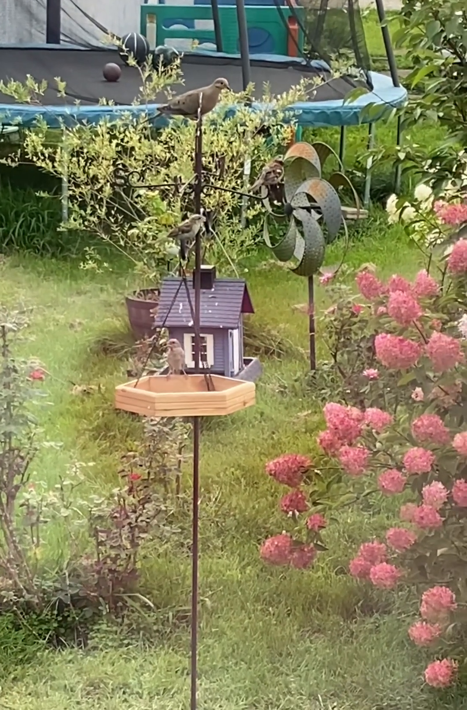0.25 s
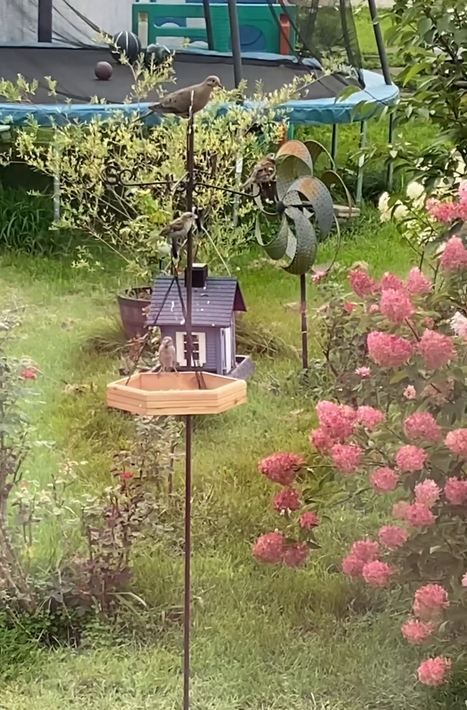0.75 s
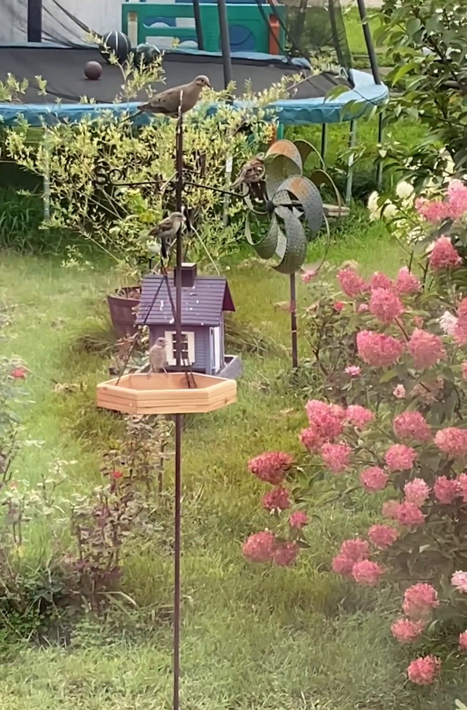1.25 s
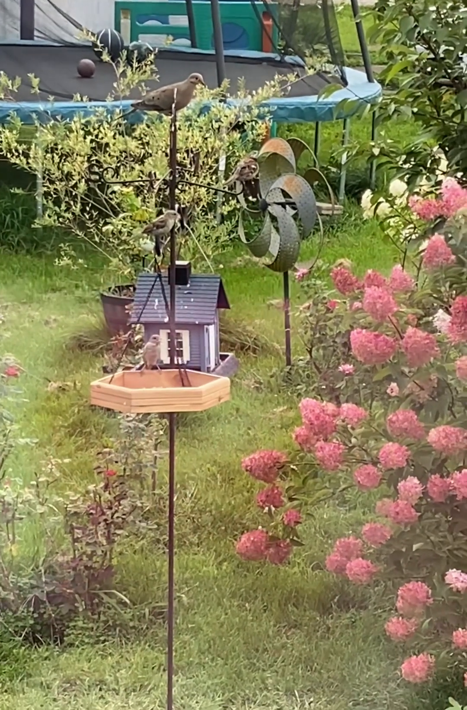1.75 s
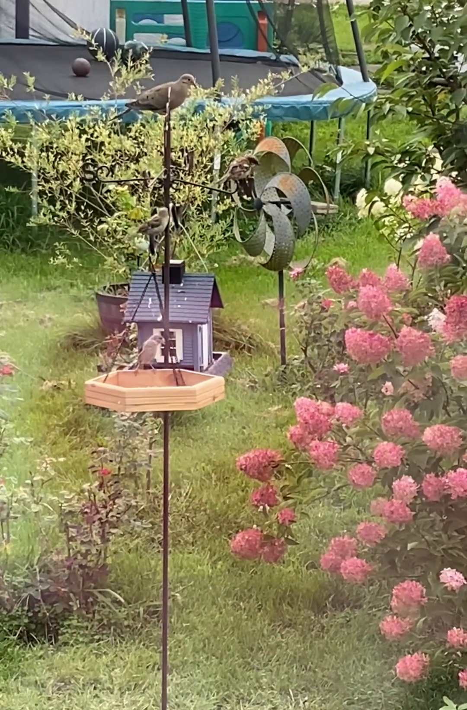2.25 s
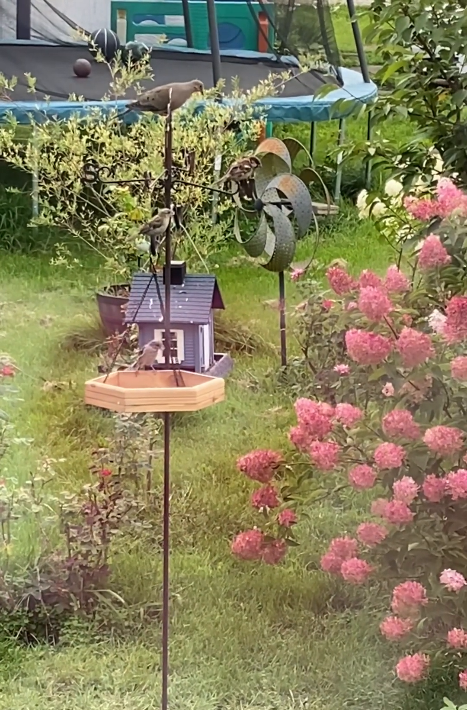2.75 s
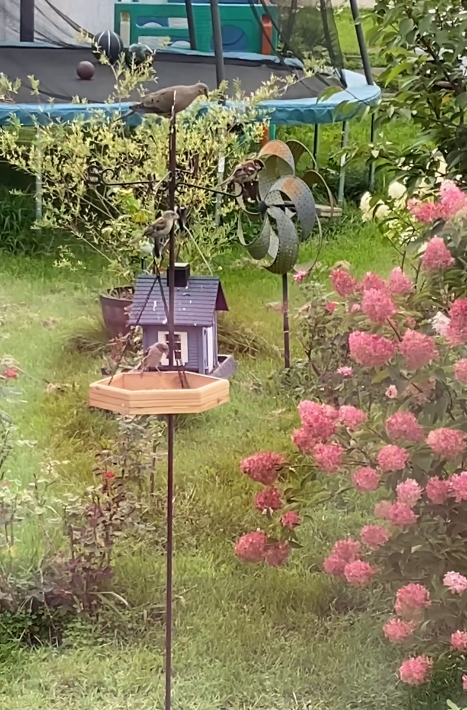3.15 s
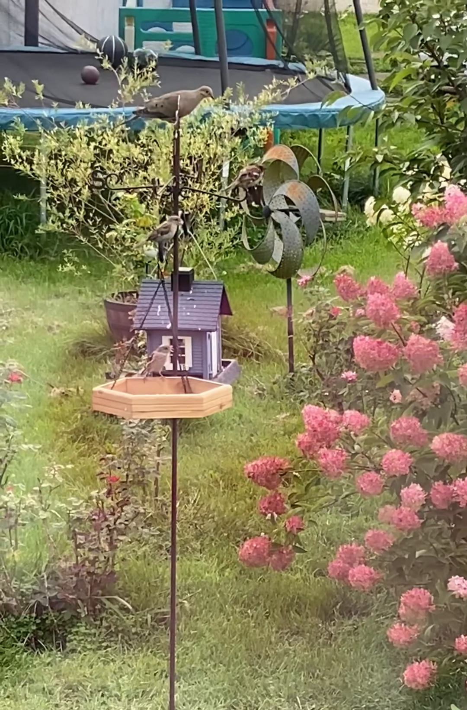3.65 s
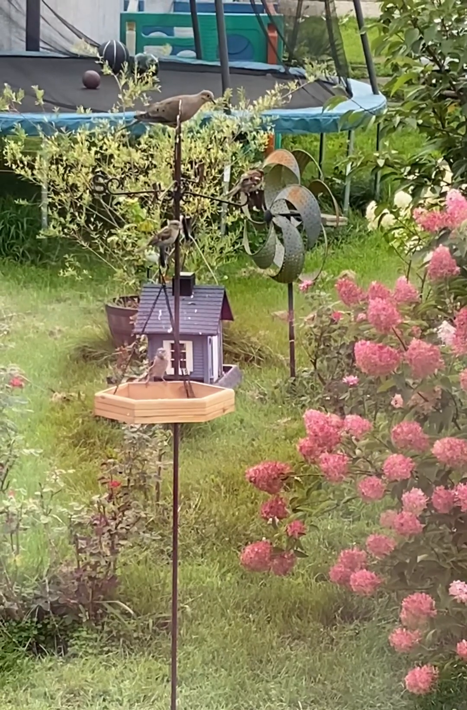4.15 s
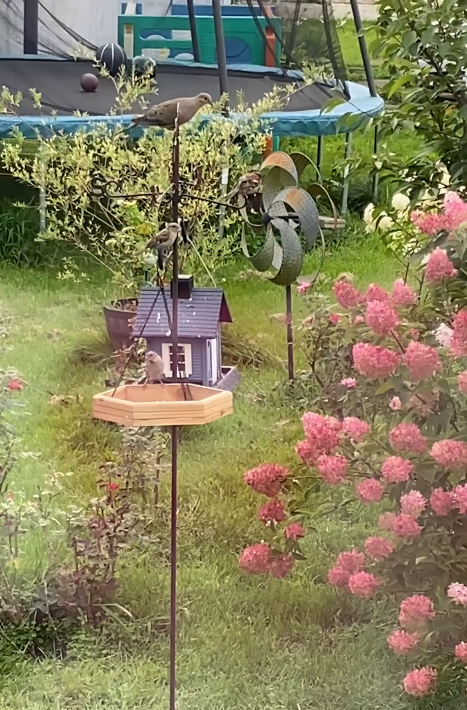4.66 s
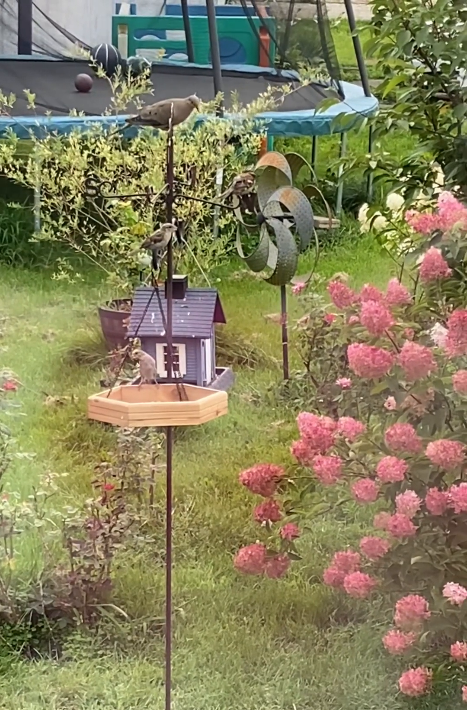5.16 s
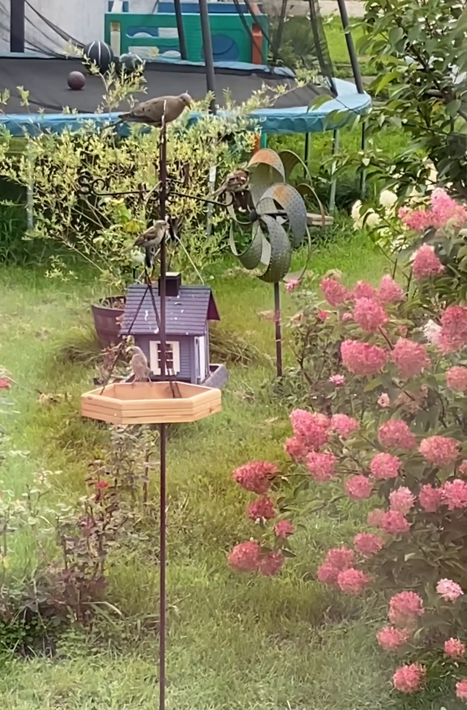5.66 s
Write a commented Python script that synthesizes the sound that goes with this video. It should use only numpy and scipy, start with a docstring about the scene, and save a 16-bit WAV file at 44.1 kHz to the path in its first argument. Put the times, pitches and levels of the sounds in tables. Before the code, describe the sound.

Quiet backyard ambience: low, wavering motor drone and far traffic rumble under continuous thin cricket trilling. One closer cricket chirps in bright quick triplets while several fainter ones overlap at different pitches. Soft brushing hisses fall in a regular two-beat pattern. A short scuff and snap occurs before one second, two faint distant hoots are nearly buried, and a low knock comes at about 5.4 seconds. Small stereo microphone, dry close details.

```python
"""A low engine drone, a machine hum and the rumble of a town are there at once, under thin high cricket trills.
Faint crickets answer one another, and a nearer one chirps in threes; each wing stroke is a short sagging tone.
Gritty noise makes the close rustles, early on and once near the end, and soft swishes in a two-beat rhythm.
Engine, hum and two faint hoots are wavering sine tones; the town is stereo noise shaped by frequency."""
import sys
import numpy as np
from scipy import signal
from scipy.fft import rfft, irfft, next_fast_len
from scipy.io import wavfile
from scipy.ndimage import uniform_filter1d, map_coordinates

SR = 44100
rng = np.random.default_rng(int(sys.argv[2]) if len(sys.argv) > 2 else 0)


def master_out(mix):
    """Clip the mix to full scale and print it as 16-bit PCM to the path in sys.argv[1]."""
    frames = np.transpose(np.atleast_2d(mix))
    ceiling = np.clip(frames, -1, 1)
    pcm = np.round(ceiling * 32767).astype(np.int16)
    wavfile.write(sys.argv[1], SR, pcm)


N = 259749
TIME = np.arange(N) / SR  # seconds


def amp(db):
    """Decibels to gain."""
    return 10 ** (np.asarray(db) / 20)


def unit(x):
    """Scale to rms 1."""
    return x / np.sqrt(np.mean(x ** 2) + 1e-20)


def along(points, hz):
    """Read a curve of (Hz, value) points on a log frequency axis."""
    f, v = np.transpose(points)
    return np.interp(np.log(hz + 1), np.log(f + 1), v)


def curves(rows):
    """Draw lines through timed rows: one value per sample for each column after the time."""
    s, *cols = np.transpose(rows)
    return [np.interp(TIME, s, c) for c in cols]


def wobble(rate):
    """A smooth random curve through `rate` random points a second."""
    points = rng.standard_normal(int(N * rate / SR) + 4)
    return map_coordinates(points, [TIME * rate])


def filtered(x, response):
    """Multiply the spectrum of x by a response that depends on frequency."""
    m = next_fast_len(N + SR // 2)
    hz = np.fft.rfftfreq(m, 1 / SR)
    return irfft(rfft(x, m) * response(hz), m)[..., :N]


def scatter(x, t60):
    """The wash of a sound among shrubs and walls, dying by 60 dB in t60 seconds."""
    t = TIME[:SR // 2]
    tail = rng.standard_normal(len(t)) * amp(-60 * t / t60)
    tail *= 1 - np.exp(-t / 0.0053)  # the wash builds up over some milliseconds
    return signal.fftconvolve(x, tail / np.linalg.norm(tail))[:N]


def swell(s, rise, t60):
    """An envelope that rises to 1 at time s and then dies by 60 dB in t60 seconds."""
    before = np.minimum(TIME - s, 0)
    after = np.maximum(TIME - s, 0)
    return np.exp(-(before / rise) ** 2) * amp(-60 * after / t60)


def grit(per_s, smooth):
    """Tiny snaps of random size at random times, over a share of smooth hiss; rms 1."""
    snaps = (rng.random(N) < per_s / SR) * rng.standard_normal(N)
    return unit(unit(snaps) + smooth * rng.standard_normal(N))


def add_stroke(out, s, db, hz, width, fall, brake=.3):
    """One wing closure: a tone that swells and sags by the share fall per width, faster as the scraper brakes."""
    i = np.arange(*np.searchsorted(TIME, [s - 3 * width, s + 3 * width]))
    u = (TIME[i] - s) / width
    pitch = hz * (1 - fall * (u + brake * u ** 2))
    phase = 2 * np.pi * (np.cumsum(pitch) / SR + rng.random())
    out[i] += amp(db) * np.exp(-u ** 2) * np.sin(phase)


# How alike left and right are in the background.
# Each row: frequency in Hz, likeness (1 = identical).
ALIKENESS = [(100, 1), (200, .99), (350, 0.85), (650, 0.51), (1300, 0.41), (2500, 1), (3500, 1), (6000, 1),
             (13000, 1)]
# How far the background leans to the left.
# Each row: frequency in Hz, left level over right level in dB.
LEFT_LEAN = [(120, -0.5), (370, 2.5), (680, 5), (1240, 1.5), (3000, 0)]


def diffuse(spectrum):
    """Stereo noise of rms 1 from all round: a shared part and an opposed part set how alike the sides are."""
    def mid_side(hz):
        turn = np.arccos(np.clip(along(ALIKENESS, hz), -1, 1)) / 2
        return amp(along(spectrum, hz)) * [np.cos(turn), np.sin(turn)]

    mid, side = filtered(rng.standard_normal((2, N)), mid_side)
    pair = np.array([mid + side, mid - side])
    return unit(filtered(pair, lambda hz: amp(np.outer([.5, -.5], along(LEFT_LEAN, hz)))))


# The colour of the low rumble; only the shape counts.
# Each row: frequency in Hz, relative level in dB per Hz.
RUMBLE_COLOUR = [(20, -27), (30, -15), (42, -3.5), (60, 2), (120, -0.5), (180, -.5), (230, -9), (310, -9.3),
                 (420, -23), (800, -67)]
# The colour of the softer rush above it; only the shape counts.
# Each row: frequency in Hz, relative level in dB per Hz.
AIR_COLOUR = [(150, -8), (300, 1), (420, -1), (520, -1.5), (700, -1), (1000, -10), (1500, -18.5),
              (2000, -28), (3300, -33), (4600, -30), (6300, -39.5), (10500, -39.5), (12300, -42),
              (14000, -56)]


def town(rumble_db=-49.0, air_db=-62.3, sway_db=1.04, patchy_db=1):
    """Low rumble of far traffic, and the softer, slightly restless rush above it, both as shaped noise."""
    z = signal.stft(diffuse(AIR_COLOUR), nperseg=1024)[2]
    # small patches of time and pitch get a little louder or softer
    patches = uniform_filter1d(rng.standard_normal(z.shape[1:]), size=4, axis=0)
    patches = uniform_filter1d(patches, size=10, axis=1)
    air = signal.istft(z * amp(patchy_db * unit(patches)), nperseg=1024)[1][:, :N]
    rumble = amp(rumble_db + sway_db * wobble(3)) * diffuse(RUMBLE_COLOUR)
    return rumble + amp(air_db) * air


# The steady machine tones.
# Each row: pitch in Hz, level in dB halfway through, change of level in dB per second.
HUM_TONES = [(58.5, -54.5, -1), (135.9, -50, -0.2), (513, -81, 0), (604, -76, 0), (711, -77, .5)]
# One more machine tone, which comes and goes.
# Each row: time in seconds, level in dB.
WHINE_LEVEL = [(0, -61.5), (1.3, -63), (1.7, -57), (2.2, -65), (2.4, -58.5), (2.75, -67), (3.3, -61),
               (3.9, -64), (4.35, -56.5), (4.8, -62), (5.3, -55.5), (5.89, -58)]
WHINE_HZ = 272


def hum(waver_db=1.8, drift_per_hz=.003):
    """Machine tones that waver on their way through the air; the higher the tone, the more its phase drifts."""
    tones = [(hz, db + trend * (TIME - TIME.mean())) for hz, db, trend in HUM_TONES]
    tones += [(WHINE_HZ, curves(WHINE_LEVEL)[0])]
    out = np.zeros(N)
    for hz, db in tones:
        level = np.sqrt(2) * amp(db + waver_db * wobble(8))  # root 2 turns rms into peak
        out += level * np.sin(2 * np.pi * hz * TIME + drift_per_hz * hz * wobble(10))
    return out


# How fast the engine turns. Each row: time in seconds, cycles per second.
CYCLE_RATE = [(0, 19.7), (.6, 19.9), (1.2, 20.15), (2.1, 20.86), (2.7, 20.6), (4.2, 20.21), (5.89, 20.1)]
# Its deepest tone, three times the cycle rate. Each row: time in seconds, level in dB.
THROB_LEVEL = [(0, -48), (.9, -56.5), (1.7, -51), (2.2, -43.5), (2.78, -42), (3.4, -52), (3.85, -45.5),
               (4.4, -44.5), (5.3, -57.5), (5.89, -47)]
# Its main drone, four times the cycle rate. Each row: time in seconds, level in dB.
DRONE_LEVEL = [(0, -51), (.22, -43.5), (.45, -52), (.62, -41), (1.2, -37), (1.38, -42.5), (1.6, -38.5),
               (2.02, -43.5), (2.2, -62), (2.45, -60), (2.62, -47), (3.1, -46.5), (4.2, -51), (4.85, -46),
               (5.6, -57), (5.89, -50)]
# Its upper tones, which grow while it pulls.
# Each row: multiple of the cycle rate, level in dB at zero effort, share of the effort added.
UPPER_ORDERS = [(5, -56, 1), (7, -55, .75)]
# How hard it works, heard in the upper tones. Each row: time in seconds, effort in dB.
EFFORT = [(0, 2.5), (.5, 2), (1.3, 6), (1.8, 10), (2.2, 6), (2.5, 0), (3.1, 2), (4.1, -3.5), (4.6, -1.5),
          (5.2, -2.5), (5.89, 4)]


def engine(flutter=0.25, waver_db=1.6):
    """Only the low orders of the exhaust carry this far; the upper ones grow with its effort."""
    rate, effort_db = curves(CYCLE_RATE)[0], curves(EFFORT)[0]
    cycle = 2 * np.pi * np.cumsum(rate) / SR
    orders = [(3, curves(THROB_LEVEL)[0]), (4, curves(DRONE_LEVEL)[0])]
    orders += [(round(k), db + share * effort_db) for k, db, share in UPPER_ORDERS]
    out = np.zeros(N)
    for k, db in orders:
        level = np.sqrt(2) * amp(db + waver_db * wobble(7))
        out += level * np.sin(k * cycle + 2 * np.pi * rng.random() + flutter * wobble(9))
    return out


# Faint distant hoots. Each row: time of the peak in seconds, pitch in Hz, level in dB.
HOOT_CALLS = [(.36, 604, -61.5), (1.695, 615, -57)]


def hoots(rise=0.03, t60=0.25):
    """Two soft, short tones from far away, slightly unsteady in phase."""
    out = np.zeros(N)
    for s, hz, db in HOOT_CALLS:
        out += amp(db) * swell(s, rise, t60) * np.sin(2 * np.pi * hz * TIME + .5 * wobble(40))
    return out


# The colour of the brushing noise; only the shape counts.
# Each row: frequency in Hz, relative level in dB.
SWISH_COLOUR = [(600, -5.5), (1500, -9.5), (2200, -10.5), (3050, -1), (3500, -8), (4300, 2), (4800, -1),
                (5700, -2), (6600, -9), (8500, -11), (10200, -17.5), (12000, -32.5)]
# Ringing tones inside the swish.
# Each row: pitch in Hz, width in Hz, relative level in dB before each beat's own change.
HOLLOW_RINGS = [(3040, 200, -4), (4340, 80, 4), (3900, 200, -7), (4900, 160, -8), (5650, 60, -8)]
# first beat, length of the whole cycle, delay of the second beat
SWISH_START_S, SWISH_CYCLE_S, SWISH_SECOND_S = .257, .8905, .521


def swishes(level_db=-68.6, second_db=0.4, grain_db=.7, catch_db=.9, wash_db=-10,
            first_ring_db=-3, second_ring_db=2, ring_scatter_db=2.5, detune=.004):
    """Short brushing hisses on something hollow, two in each even cycle; the second is set to ring more."""
    beats = [(s, level_db, first_ring_db) for s in np.arange(SWISH_START_S, N / SR, SWISH_CYCLE_S)]
    beats += [(s + SWISH_SECOND_S, db + second_db, second_ring_db) for s, db, _ in beats]
    hiss = np.zeros(N)
    for s, db, ring_db in beats:
        rings = [(hz * (1 + rng.normal(0, detune)), width, level + ring_db + rng.normal(0, ring_scatter_db))
                 for hz, width, level in HOLLOW_RINGS]

        def colour(f):
            ringing = sum(amp(level) / (1 + (2 * (f - hz) / width) ** 2) for hz, width, level in rings)
            return amp(along(SWISH_COLOUR, f)) + ringing

        stroke = swell(s, rise=0.019, t60=0.79)
        stroke /= 1 + np.exp(np.clip((TIME - s - .07) / 0.017, -50, 50))  # fades off around 70 ms
        hiss += amp(db) * stroke * unit(filtered(grit(per_s=3000, smooth=.8), colour))
    hiss *= amp(grain_db * wobble(300) + catch_db * wobble(70))  # the brushing catches and slips
    return hiss + amp(wash_db) * scatter(hiss, t60=0.48)


# Close rustles and taps; the rows at .785 and .795 s instead add to the second swish of the first cycle. Each
# row: time of the peak in seconds, level in dB before the envelope, rise in seconds, time to die by 60 dB in
# seconds, centre in Hz, width in octaves.
RUSTLE_EVENTS = [(.197, -75, 0.012, 0.16, 4500, 1.25), (.608, -60.5, 0.009, .14, 9000, 0.8),
                 (.608, -64, .003, .05, 5000, .6), (.616, -61.5, 0.003, 0.08, 3500, 1),
                 (.64, -69, 0.015, .6, 5500, 1.2), (.745, -77.5, 0.025, .45, 9800, 0.45),
                 (.795, -79, .025, .33, 9300, .4), (.785, -72, .016, .25, 3900, .5),
                 (.84, -72.5, 0.045, 0.28, 2170, 0.85), (.853, -74, .015, .3, 4850, .07),
                 (5.434, -58, .003, .13, 700, 0.85), (5.434, -78, .002, .07, 3600, .3)]


def rustles(grain_db=1.3, lump_db=.9, spread=0.25, top_hz=15000):
    """Brief scuffs and snaps close by: bands of gritty noise, slightly spread between left and right."""
    out = np.zeros((2, N))
    for s, db, rise, t60, centre, octaves in RUSTLE_EVENTS:
        def colour(hz):
            band = np.exp(-.5 * (np.log2((hz + 1) / centre) / octaves) ** 2)
            return band / (1 + (hz / top_hz) ** 10)

        middle, side = filtered(np.array([grit(per_s=2500, smooth=.7), rng.standard_normal(N)]), colour)
        pair = unit(np.array([middle + spread * side, middle - spread * side]))
        out += amp(db) * swell(s, rise, t60) * pair
    return out * amp(grain_db * wobble(400) + lump_db * wobble(60))


def far_trill(level_db=-87, range_db=3, centre_hz=7750, spread_hz=290, count=2600):
    """A crowd of more distant trillers, strokes at random times, fills the gaps of the nearer ones."""
    song = np.zeros(N)
    for (when, loud), pitch in zip(rng.random((count, 2)), rng.standard_normal(count)):
        hz = centre_hz + spread_hz * np.clip(pitch, -2.4, 1.6)
        add_stroke(song, when * N / SR, level_db + range_db * loud, hz, width=.005, fall=.01)
    return song


# Trills of small crickets; the first two rows are alternating strokes of one cricket.
# Each row: strokes per second, first stroke in seconds, pitch in Hz, level in dB before the swell,
# stroke width in seconds, share of the pitch lost per width.
TRILL_STROKES = [(16.4, .014, 7920, -71.3, .0055, .005), (16.4, .045, 7890, -74.5, .0055, .005),
                 (16.35, .02, 7400, -76, .011, .028)]
# How the whole trill swells and sinks. Each row: time in seconds, gain in dB.
TRILL_GAIN = [(0, -0.5), (1.3, -2.5), (2.1, -1), (2.6, 2.5), (3.4, 0.5), (3.65, -2.5), (4.65, -2),
              (5.25, 1.5), (5.6, -3), (5.89, 0)]


def trill(rasp=.5, rasp_width_hz=190, wash_db=-2.5, skirt_db=-26, jitter_s=.002, vary_db=1.5, detune=.005):
    """Small crickets stroke without a pause at nearly the same pace, one in two alternating strokes;
    another glides far down with every stroke."""
    song = np.zeros(N)
    for rate, first, hz, db, width, fall in TRILL_STROKES:
        for s in np.arange(first, N / SR, 1 / rate):
            when = s + rng.normal(0, jitter_s)
            level = db + rng.normal(0, vary_db)
            add_stroke(song, when, level, hz * (1 + rng.normal(0, detune)), width, fall, brake=.1)
    # uneven teeth spread the tone into a band with wide skirts
    song *= 1 + rasp * wobble(4 * rasp_width_hz) + amp(skirt_db) * wobble(3000)
    song += amp(wash_db) * scatter(song, t60=0.2)
    return song * amp(curves(TRILL_GAIN)[0])


def chorus(level_db=-92, range_db=6, centre_hz=4640, spread_hz=230, wash_db=-2, count=380):
    """Many more crickets, so far off that their strokes, at random times, blur together."""
    song = np.zeros(N)
    for (when, loud), pitch in zip(rng.random((count, 2)), rng.standard_normal(count)):
        hz = centre_hz + spread_hz * pitch
        add_stroke(song, when * N / SR, level_db + range_db * loud, hz, width=.0075, fall=.03)
    return song + amp(wash_db) * scatter(song, t60=.2)


# Chirps of four farther crickets.
# Each row: last stroke in seconds, its level in dB before the group gain, its pitch in Hz, number of strokes.
FAR_CHIRPS = [(.1, -74.5, 4840, 3), (.168, -76, 4080, 2), (.176, -71, 4560, 3), (.465, -73, 4640, 3),
              (.564, -76.5, 4060, 2), (1.066, -73, 4580, 2), (1.232, -70, 4930, 3), (1.245, -77, 4060, 2),
              (1.377, -73, 4590, 3), (1.49, -82, 5400, 3), (1.5, -79, 4860, 3), (1.604, -74.5, 4050, 2),
              (1.65, -73, 4680, 3), (1.835, -80, 5380, 2), (1.94, -77.5, 4000, 2), (1.987, -73.5, 4520, 3),
              (2.178, -67.5, 4930, 3), (2.275, -71, 4610, 3), (2.304, -72.5, 4070, 2), (2.67, -73, 4050, 2),
              (2.83, -77, 4847, 2), (2.868, -73.5, 4510, 3), (3.075, -77, 4080, 2), (3.227, -72.5, 4566, 3),
              (3.255, -82, 5350, 2), (3.33, -76, 4865, 3), (3.455, -74, 4070, 2), (3.53, -73, 4600, 2),
              (3.69, -71.5, 4830, 3), (3.8, -73, 4078, 2), (4.07, -76.5, 4829, 2), (4.147, -73, 4070, 2),
              (4.15, -72, 4600, 3), (4.462, -71, 4540, 3), (4.522, -76.5, 4072, 2), (4.627, -73, 4896, 2),
              (4.87, -74.5, 4070, 2), (5.0, -75, 4560, 3), (5.035, -84, 5300, 3), (5.16, -75, 4820, 3),
              (5.23, -75, 4060, 2), (5.287, -68.5, 4570, 2), (5.504, -68, 4880, 3), (5.553, -74, 4570, 3),
              (5.58, -77, 4060, 2), (5.925, -70, 4060, 2)]


def far_crickets(spacing=.042, reply_db=-.5, build_db=3.5, wash_db=-6, rise=.018, fall=.025,
                 echo_s=0.014, echo_db=-8.5):
    """Each chirp climbs in pitch and level to its last stroke; the fence repeats every stroke."""
    song = np.zeros(N)
    for s, db, hz, strokes in FAR_CHIRPS:
        for k in range(round(strokes)):  # k counts back from the last stroke
            when = s - k * spacing
            level = db + reply_db - k * build_db
            pitch = hz * (1 - k * rise + rng.normal(0, 0.0043))
            add_stroke(song, when, level, pitch, width=.0072, fall=fall)
            add_stroke(song, when + echo_s, level + echo_db, pitch * (1 - fall), width=0.0066, fall=fall)
    song *= 1 + 0.39 * wobble(350)  # paths through the leaves break up each stroke
    return song + amp(wash_db) * scatter(song, t60=0.16)


# Chirps of the near cricket.
# Each row: reference time near the last stroke in seconds, level in dB before the overall gain.
NEAR_CHIRPS = [(0.5254, -61.5), (1.1262, -62), (1.7152, -61), (2.3502, -60.5), (2.944, -60), (3.5789, -60),
               (4.376, -59.5), (5.4211, -61), (5.8551, -60)]
# The three wing strokes in every chirp.
# Each row: lead before the reference time in seconds, level in dB against the chirp, width in seconds.
WING_STROKES = [(.0785, -4.6, .0075), (.041, -.9, .0055), (0.0012, 0, .0048)]
# Echoes off ground and fence. Each row: delay in seconds, level in dB against the stroke.
ECHOES = [(.0088, -6), (.0155, -4.5)]


def near_cricket(pitch_hz=5215, gain_db=-.8, wash_db=-7.5, sag=.023, scrape=0.29, attack_s=.0025,
                 drag_db=-15, drag_s=.009, drag_drop=.08):
    """Three strokes a chirp, the first soft and drawn out, each followed by echoes of its lower end."""
    song = np.zeros(N)
    for end, chirp_db in NEAR_CHIRPS:
        for lead, stroke_db, width in WING_STROKES:
            s = end + attack_s - lead
            db = chirp_db + stroke_db + gain_db
            hz = pitch_hz * (1 + rng.normal(0, 0.0027))
            add_stroke(song, s, db, hz, width, fall=0.008)
            # the slowing wing drags on, faint and lower
            add_stroke(song, s + drag_s, db + drag_db, hz * (1 - drag_drop), width=.007, fall=.035)
            for delay, echo_db in ECHOES:
                when = s + delay + rng.normal(0, .001)
                level = db + echo_db + rng.normal(0, 1.5)
                echo_hz = hz * (1 - sag + rng.normal(0, .006))
                add_stroke(song, when, level, echo_hz, width=0.0058, fall=.011)
    song *= 1 + scrape * wobble(650)  # the scraper catches unevenly
    return song + amp(wash_db) * scatter(song, t60=0.2)


def scene():
    """Insects and small noises over the low drone."""
    background = town() + hum() + engine() + hoots()
    small_noises = swishes() + rustles()
    insects = far_trill() + trill() + chorus() + far_crickets() + near_cricket()
    return background + small_noises + insects


# How far the left port runs ahead of the right one. Each row: frequency in Hz, phase lead in radians.
PORT_LEAD = [(600, 0), (1800, 0), (2500, 0.48), (3400, 0), (4300, 0.83), (5300, 0.55), (6000, 1.6),
             (7200, 3), (7900, 3.68), (8500, 4.5), (9700, 5), (11500, 7), (12800, 10)]
TOP_HZ = 15800


def record(dry):
    """The two ports drift apart in phase through the treble; nothing passes above the band limit."""
    def ports(hz):
        return np.exp(np.outer([.5j, -.5j], along(PORT_LEAD, hz))) * (hz < TOP_HZ)

    fade = np.minimum(1, np.minimum(TIME, TIME[::-1]) / .004)  # 4 ms at both ends
    return filtered(dry * fade, ports)


dry = scene()
out = record(dry)
master_out(out)
```